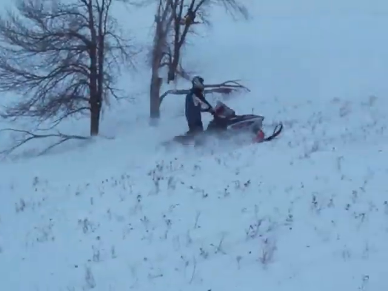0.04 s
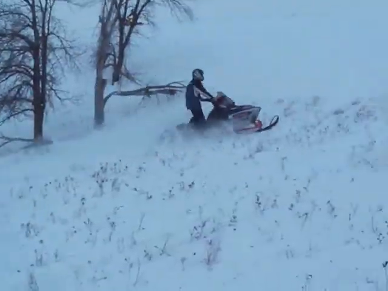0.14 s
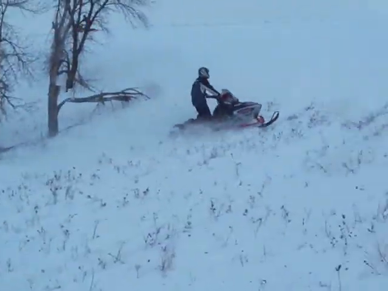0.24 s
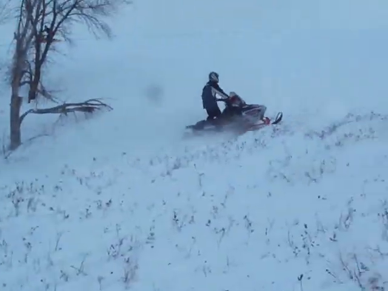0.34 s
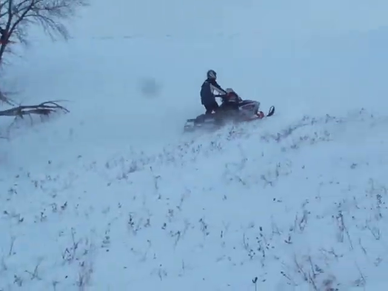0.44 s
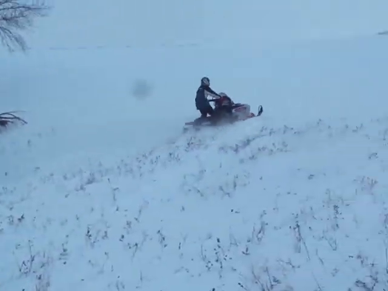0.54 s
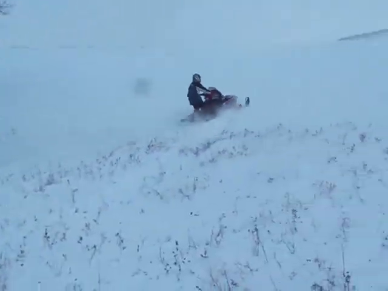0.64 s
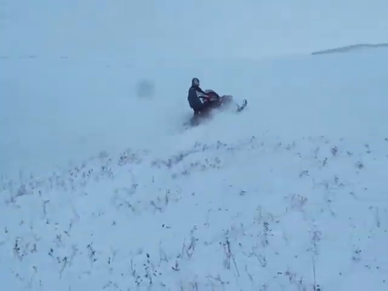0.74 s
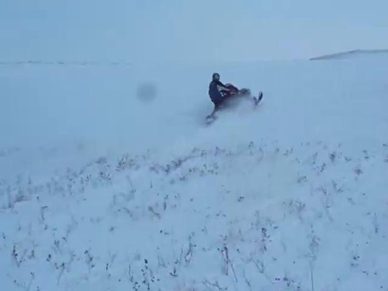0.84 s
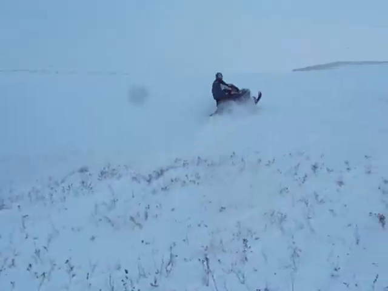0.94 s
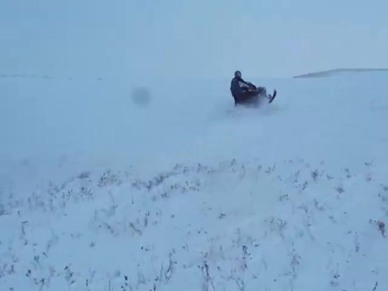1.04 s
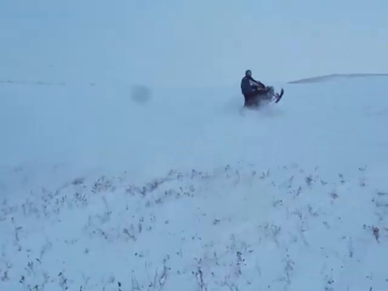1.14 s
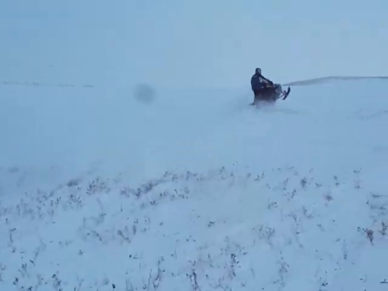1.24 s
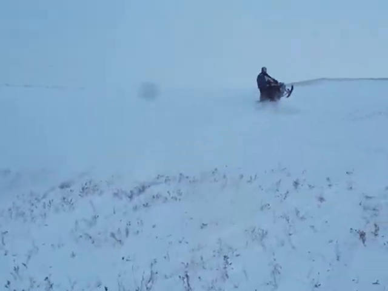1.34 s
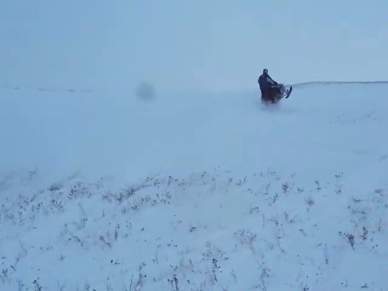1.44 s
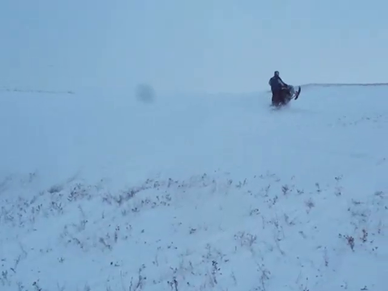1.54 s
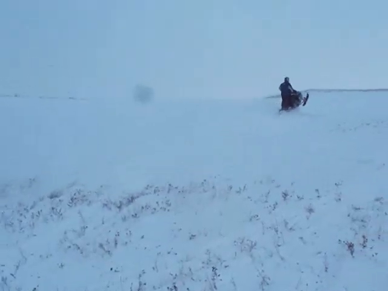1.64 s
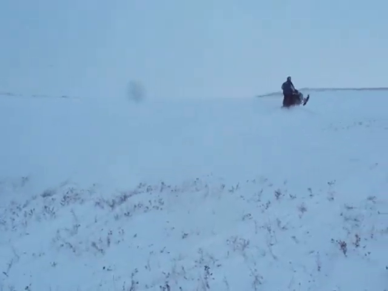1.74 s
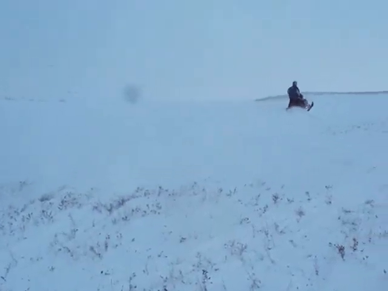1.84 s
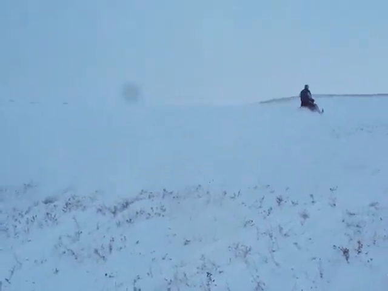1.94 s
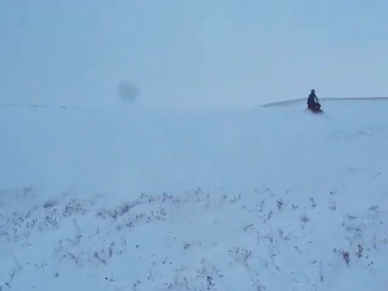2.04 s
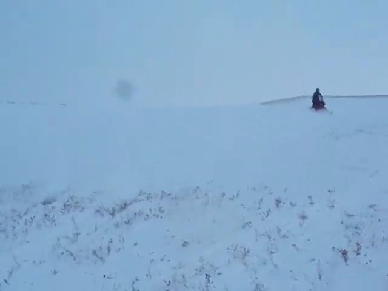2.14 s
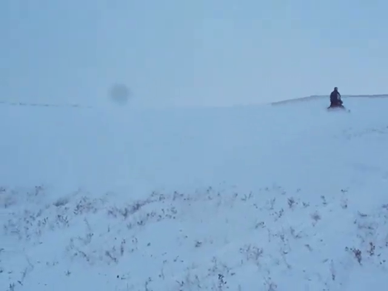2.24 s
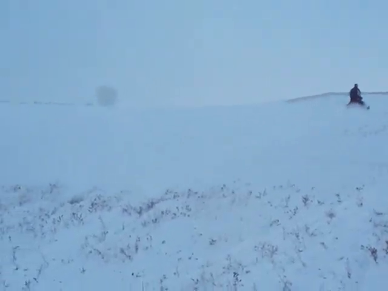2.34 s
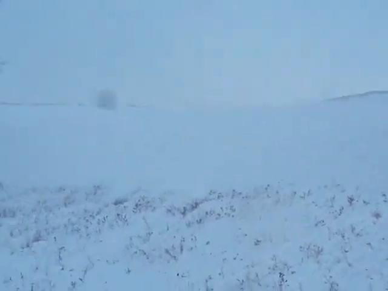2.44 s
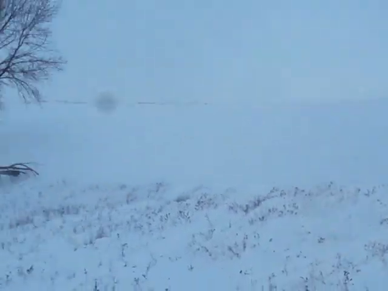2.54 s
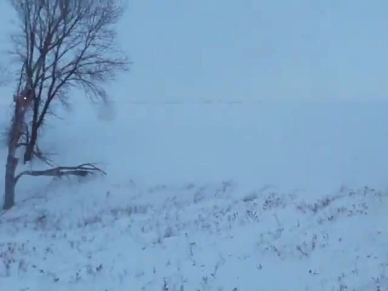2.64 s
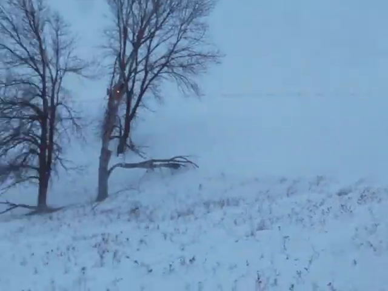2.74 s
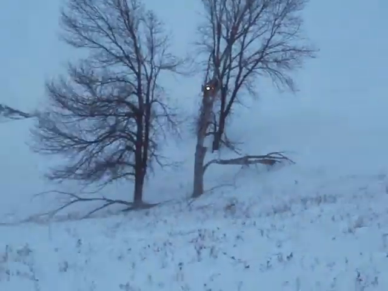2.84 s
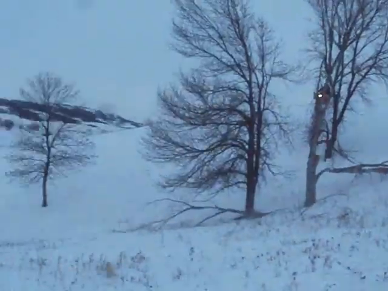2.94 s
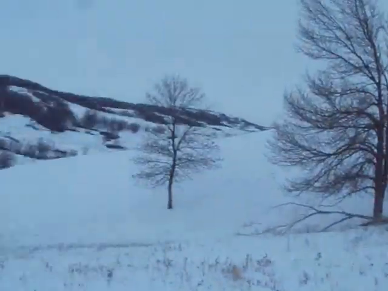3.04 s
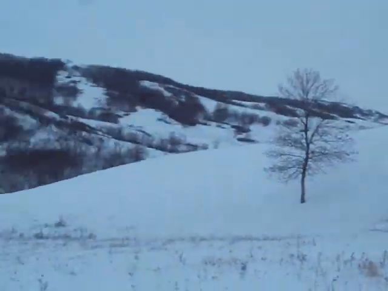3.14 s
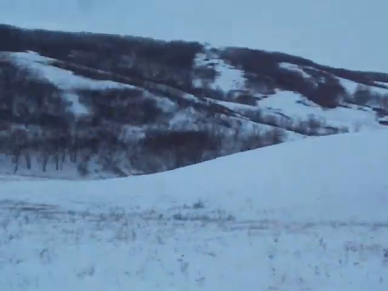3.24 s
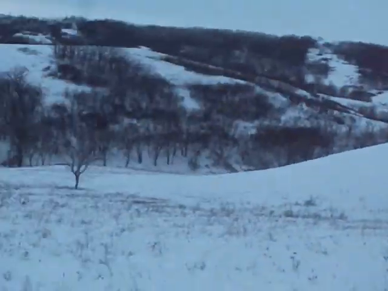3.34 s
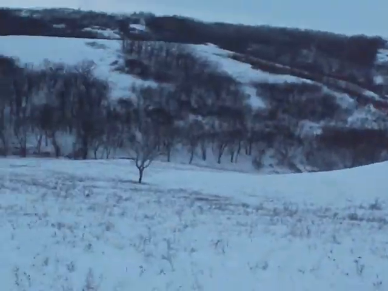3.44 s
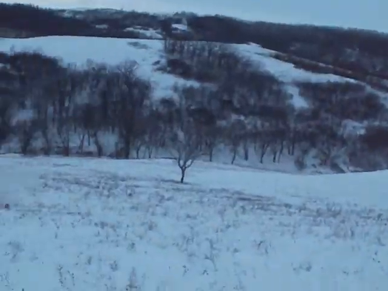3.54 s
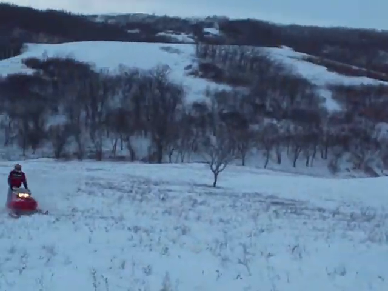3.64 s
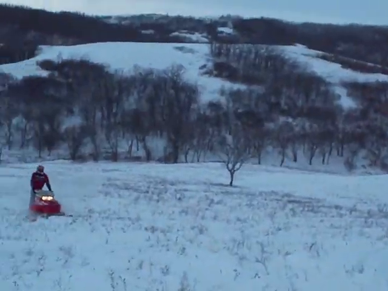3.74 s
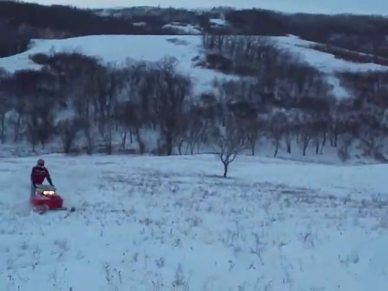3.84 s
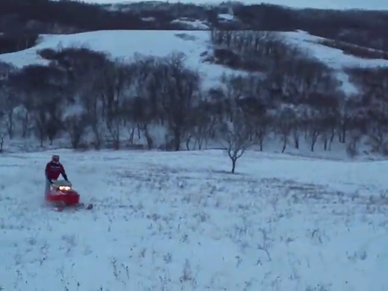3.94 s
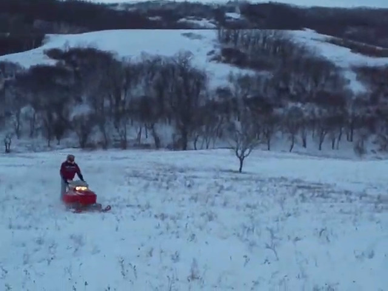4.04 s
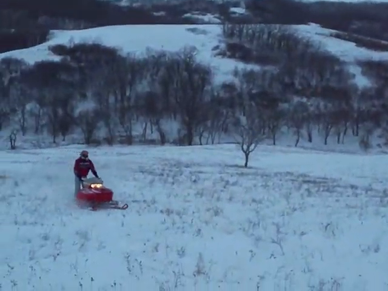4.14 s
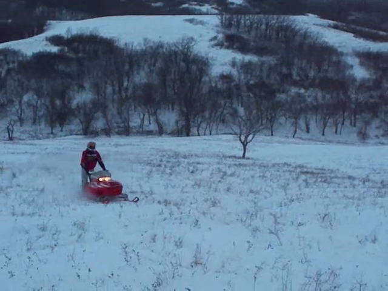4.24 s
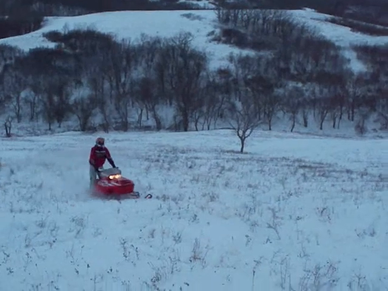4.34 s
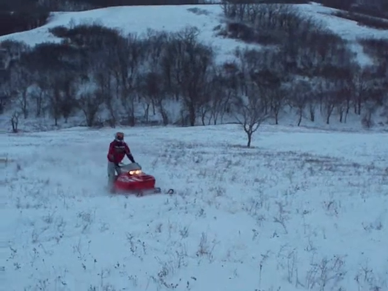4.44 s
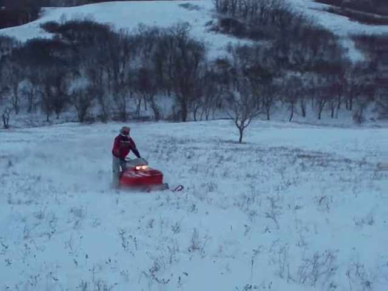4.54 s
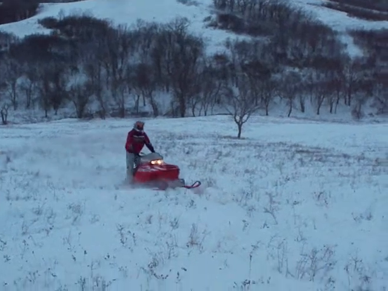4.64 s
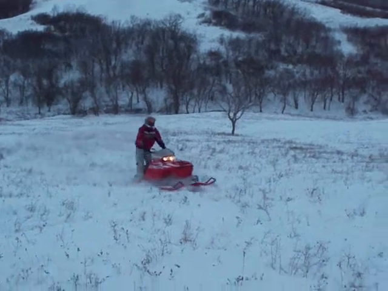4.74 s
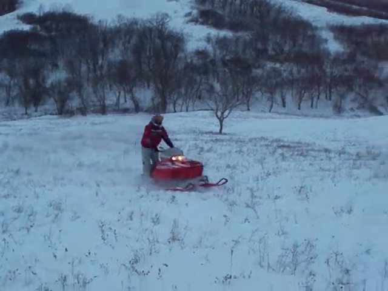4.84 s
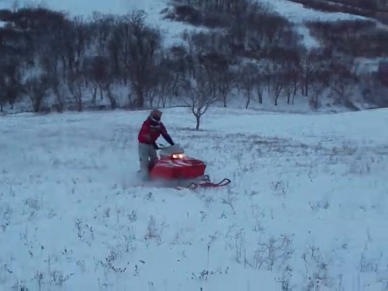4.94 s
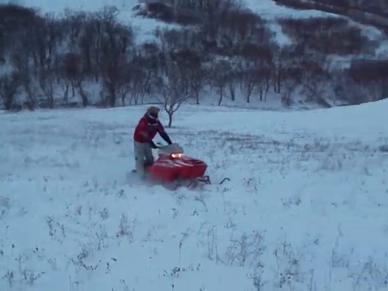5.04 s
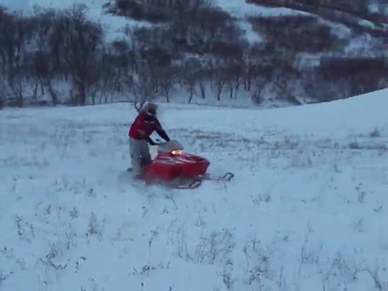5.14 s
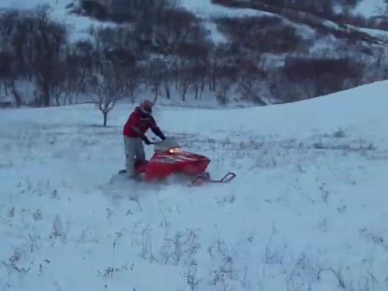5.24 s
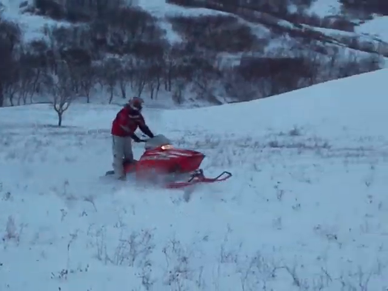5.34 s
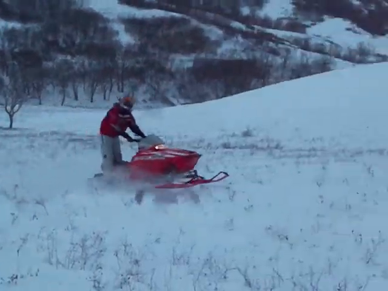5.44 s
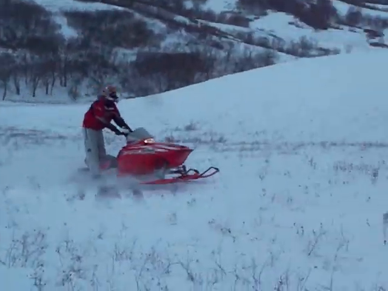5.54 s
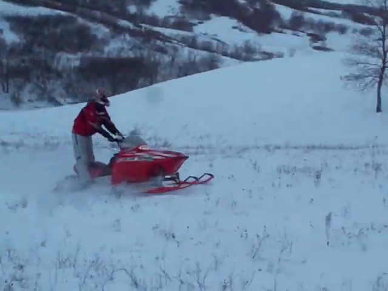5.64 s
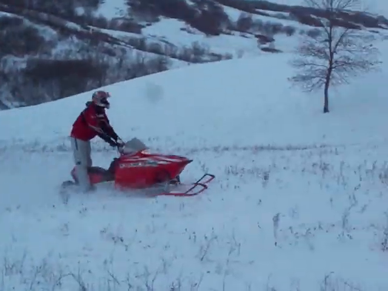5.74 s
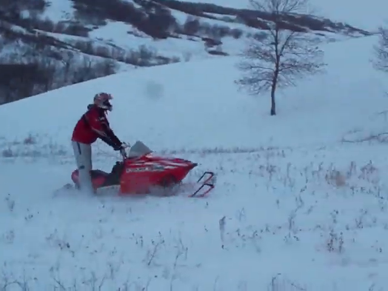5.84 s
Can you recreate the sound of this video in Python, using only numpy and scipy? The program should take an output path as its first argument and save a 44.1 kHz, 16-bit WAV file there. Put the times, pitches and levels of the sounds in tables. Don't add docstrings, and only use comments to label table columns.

```python
import sys
import numpy as np
from scipy import signal
from scipy.fft import rfft, irfft
from scipy.io import wavfile
from scipy.ndimage import uniform_filter1d, minimum_filter1d

SR = 44100
rng = np.random.default_rng(int(sys.argv[2]) if len(sys.argv) > 2 else 0)


def store_pcm(level_fs):
    pcm = np.round(np.clip(level_fs, -1, 1) * 32767).astype(np.int16)
    wavfile.write(sys.argv[1], SR, np.atleast_2d(pcm).T)


def voltage_ratio(decibels):
    exponent = np.asarray(decibels, float) / 20
    return 10 ** exponent


N = 260190


def engine(revs, path, orders, hiss_colour, hillside, mismatch, shadow, roar_db, roar_follows, roar_rasp,
           echo, echo_s, spread, lean, jitter, rough, wander_db, gate, crack_share, heard, nose_db):
    # t/s, loss/dB
    hollows = [
        (.525, 3.5),
        (.566, 5),
        (.65, 2.5),
        (.74, 9.5),
        (.776, 11.5),
        (3.18, 5),
        (5.07, 5),
        (5.28, 6.5),
    ]
    # f/Hz, level/dB per Hz
    roar_colour = [(100, -62.5), (200, -22), (450, -12.5), (700, -8), (1100, -6), (1500, -1), (1950, -6),
                   (2250, -12), (2800, -20), (4200, -21.5)]
    t = np.arange(N) / SR
    (firing_hz,) = in_time(revs)
    engine_db, heading, lag_ms, rasp_db = in_time(path)
    hollow_width_s = 0.016
    for s, loss_db in hollows:
        engine_db = engine_db - loss_db * np.exp(-((t - s) / hollow_width_s) ** 2)

    firings = np.cumsum(firing_hz) / SR + jitter * drift(49)
    tones = crank_tones(firings, firing_hz, engine_db, heading, lag_ms, orders, hillside, mismatch, shadow,
                        echo, echo_s, spread, lean, wander_db, nose_db)
    strength = rng.standard_normal(4000)
    tones *= 1 + rough * np.interp(firings, np.arange(4000), strength)

    puff = 1 + gate * np.cos(2 * np.pi * firings)
    roar_level_db = roar_db + roar_follows * (engine_db + 26) + roar_rasp * (rasp_db + 12.5)
    roar = voltage_ratio(roar_level_db) * coloured(puff * rng.standard_normal(N), roar_colour)

    cracks = rms_one(np.diff(np.floor(firings), prepend=0))
    rasp = puff * rng.standard_normal(N) + crack_share * cracks
    flicker_db = 1.6 * drift(16)
    hiss = voltage_ratio(engine_db + rasp_db + 1.5 + flicker_db) * coloured(rasp, hiss_colour)
    return (tones + roar + hiss) * np.interp(t, *np.transpose(heard))


def crank_tones(firings, firing_hz, engine_db, heading, lag_ms, orders, hillside, mismatch, shadow,
                echo, echo_s, spread, lean, wander_db, nose_db):
    # t/s, length/s, crank order, gain/dB
    swells = [(0.033, 0.082, 12, 2.5), (0.11, .12, 20, 6.5), (.1, .12, 22, 1.5), (0.34, 0.088, 12, 6),
              (1.53, .12, 14, 2.5), (2.91, 0.22, 22, 9), (2.3, 0.11, 18, 2), (3.045, 0.053, 8, 4),
              (4.54, 0.036, 14, 8), (5.13, 0.08, 8, -8.5), (5.17, .05, 14, 9.5), (5.197, 0.061, 26, 11),
              (5.228, 0.09, 4, 6.5), (5.55, 0.21, 16, -7.5), (5.55, 0.18, 20, -7), (4.95, .12, 10, -9),
              (3.2, 0.091, 8, -8.5), (5.48, 0.087, 12, 3.5), (2.7, .25, 26, 5), (2.8, 0.15, 6, -6),
              (.18, 0.053, 12, 4.5), (1.3, .12, 10, 1.5), (3.87, 0.14, 12, 3.5), (5.72, 0.06, 22, 3),
              (0.5, 0.11, 14, -6.5)]
    slow = np.arange(0, N, 64)
    t = slow / SR
    (mismatch_db,), (shadow_db,) = in_time(mismatch), in_time(shadow)
    mismatch_db, shadow_db = mismatch_db[slow], shadow_db[slow]
    engine_db, heading, lag_s = engine_db[slow], heading[slow], lag_ms[slow] / 1000
    hood_db = nose_db * np.clip(heading, 0, 2) * np.clip(4 + mismatch_db / 10, 0, 1)

    wander_hz = 5.55
    fade = np.exp(-128 * np.pi * wander_hz / SR)
    noise = rng.standard_normal((len(orders), len(slow) + 200))
    wander = rms_one(signal.lfilter([1], [1, -2 * fade, fade ** 2], noise)[:, 200:])

    tones, mean_hz = np.zeros(N), firing_hz.mean()
    for k, (_, db, turn_db) in enumerate(orders, 1):
        level_db = db + engine_db + turn_db * heading
        level_db += wander_db * np.sqrt(k / 6) * wander[k - 1]
        if k % 2:
            level_db += mismatch_db
        if k < 4:
            level_db += shadow_db
        if k == 6:
            level_db -= hood_db
        for s, length, order, gain_db in swells:
            if round(order) == k:
                level_db += gain_db * np.exp(-((t - s) / length) ** 2)
        turn = np.pi * k * firing_hz[slow] * lag_s
        comb = np.sqrt(1 + hillside ** 2 - 2 * hillside * np.cos(turn))
        bounce = np.angle(1 + echo * np.exp(-1j * np.pi * k * mean_hz * echo_s))
        phase = np.pi * k * firings + spread * (k - 10) ** 2 - lean + bounce
        tones -= np.sqrt(2) * np.interp(np.arange(N), slow, voltage_ratio(level_db) * comb) * np.cos(phase)
    return tones


def wind():
    # t/s, peak level/dB
    thumps = [(3.008, -24), (3.17, -9), (3.22, -10), (3.468, -11), (3.562, -5), (3.61, -13), (3.689, -9),
              (3.749, -14), (3.82, -18), (3.859, -1.5), (3.89, -1.5), (3.948, -12), (4.041, -4.5),
              (4.074, -3), (4.153, -5), (4.185, -5), (4.218, -3), (4.254, -3), (4.289, -2), (4.34, -2),
              (4.384, -2.5), (4.43, 0), (4.47, -5.5), (4.53, -5.5), (4.553, -3), (4.607, -1.5), (4.7, -9),
              (4.778, -22), (4.849, -13), (5.059, -11)]
    # f/Hz, level/dB per Hz
    rumble_colour = [(30, -24.5), (60, -11), (120, -3), (200, -1), (350, -2.5), (700, -20.5), (3000, -59.5)]
    # f/Hz, level/dB per Hz
    flutter_colour = [(100, -28), (250, -6), (450, -2), (800, -6.5), (1300, -16), (3000, -40.5)]
    gust_db = gusts()
    rumble_lumps = voltage_ratio(2.0 * np.clip(drift(45), -3, 2.2))
    rumble = coloured(rumble_lumps * rng.standard_normal(N), rumble_colour)
    flutter_lumps = voltage_ratio(5.6 * np.clip(drift(120), -3, 1.9))
    flutter = coloured(flutter_lumps * rng.standard_normal(N), flutter_colour)
    out = voltage_ratio(gust_db - 1.5) * rumble + voltage_ratio(2.3 * (gust_db + 25) - 21.5) * flutter

    t = np.arange(round(.02 * SR)) / SR
    for (s, peak_db), hz in zip(thumps, rng.uniform(360, 610, len(thumps))):
        at = round(s * SR)
        swell = np.exp(-((t - .0015) * hz / 0.56) ** 2)
        out[at:at + len(t)] += voltage_ratio(peak_db - 5.0) * np.sin(2 * np.pi * hz * t) * swell
    return out


def gusts():
    # t/s, hold/s, level/dB, dying away/(dB/s)
    gust_rows = [(.08, 0.032, -26.5, 35), (0.658, 0.0092, -46.5, 113), (1.479, .01, -58, 254),
                 (1.711, 0.011, -49.5, 75), (1.99, .01, -42, 180), (2.215, 0.012, -35.5, 82),
                 (2.803, 0.0092, -34, 52), (3.008, 0.057, -30.5, 497), (3.172, 0.14, -33.5, 279),
                 (3.471, .01, -28, 320), (3.58, 0.025, -24, 150), (3.664, 0.24, -24.5, 14),
                 (4.023, 0.537, -26, 110), (4.725, 0.0087, -27.5, 306), (4.782, 0.0044, -27.5, 126),
                 (5.059, .01, -28, 90), (5.296, .01, -36, 598.5), (5.693, .15, -44.5, 109)]
    rise_db_per_s, calm_db = 253.5, -59.5
    t = np.arange(N) / SR
    strongest_db = np.full(N, calm_db)
    for s, hold, db, fall in gust_rows:
        rising_db = rise_db_per_s * np.maximum(s - t, 0)
        falling_db = fall * np.maximum(t - s - hold, 0)
        strongest_db = np.maximum(strongest_db, db - rising_db - falling_db)
    return strongest_db


def gain_control(air):
    over_db = np.maximum(20 * np.log10(np.abs(air) + 1e-9) + 10.3, 0)
    ramp_db = 67.5 * np.arange(N) / SR
    duck_db = np.maximum.accumulate(over_db + ramp_db) - ramp_db
    return .8 * signal.lfilter([.01], [1, -.99], duck_db)


def rms_one(x):
    return x / np.sqrt(np.mean(x ** 2) + 1e-20)


def in_time(rows):
    s, *columns = np.transpose(rows)
    return [np.interp(np.arange(N) / SR, s, c) for c in columns]


def drift(rate_hz):
    r = np.exp(-40 * np.pi * rate_hz / SR)
    slow = signal.lfilter([1], [1, -2 * r, r * r], rng.standard_normal(N // 20 + 2002))[2000:]
    return np.interp(np.arange(N) / 20, np.arange(len(slow)), rms_one(slow - slow.mean()))


def coloured(x, spectrum):
    hz, db = np.transpose(spectrum)
    grid = np.maximum(np.arange(N // 2 + 1) * SR / N, 1)
    return rms_one(irfft(rfft(x) * voltage_ratio(np.interp(np.log(grid), np.log(hz), db)), N))


def scene():
    # t/s, firing f/Hz
    climb_revs = [
        [(0.0, 252.6), (0.114, 259.6), (0.156, 266.8), (0.254, 271.0), (0.612, 262.2), (0.65, 266.3),
         (0.684, 260), (0.78, 258.8)],
        [(0.79, 258), (1.024, 269.3), (1.234, 271.1), (1.374, 263.4), (1.462, 269.9), (1.534, 261.6),
         (1.65, 257.7), (1.86, 255.6)],
    ]
    # t/s, engine level/dB, heading (-2..2), hillside echo lag/ms, hiss over engine/dB
    first_pull = [
        (0, -19, 0.79, 0.28, -14),
        (0.08, -14.5, -0.99, 0.18, -13),
        (0.17, -14.5, 0.048, 0.34, -9),
        (0.26, -14, -1.2, 0.37, -11),
        (0.35, -17, 0.52, 0.33, -7.5),
        (0.5, -21, -0.041, 0.48, -14),
        (0.62, -24, -0.95, 0.36, -11),
        (0.7, -18, -1.89, 0.31, -14.5),
    ]
    # t/s, engine level/dB, heading (-2..2), hillside echo lag/ms, hiss over engine/dB
    second_pull = [
        (0.81, -19, -2.4, 0.23, -7),
        (0.88, -20, 0.41, 0.37, -9.5),
        (0.981, -16, 1.43, 0.23, -5),
        (1.2, -16, 1.74, 0.67, -6),
        (1.39, -17.5, 1.4, 0.67, -9),
        (1.47, -17, 1.1, 0.69, 0.5),
        (1.58, -23.5, 1.14, 0.81, -5.5),
        (1.74, -24.5, -1.09, 0.72, -2.5),
        (1.9, -31.5, 0.18, 0.72, -5.5),
    ]
    # label (unused), level/dB, level per unit of heading/dB
    climb_orders = [(1, -45.0, 1), (1.999, -18.5, -2.5), (3.23, -46, 6), (4.003, -4.9, -0.63),
                    (5.05, -35.5, 1), (6.082, 0.0, 0.24), (7.04, -25.5, -1.5), (8, -8.5, 3),
                    (9.55, -32.5, 3.5), (10, -7, 3), (11, -28.5, 2.5), (12, -6.9, 1), (13, -27.5, 5),
                    (14, -9.5, 3.5), (15, -32.5, 4.5), (16, -15.5, -1.7), (17, -28.5, -2.5), (18, -23, 3.5),
                    (19, -34.5, -3.0), (20, -27.5, 1), (21, -46.5, 5.5), (22, -30, 4), (23, -36.5, 6),
                    (24, -22.5, 0.5), (24, -37, 6), (26, -21, 1.3)]
    # f/Hz, level/dB per Hz
    climb_hiss = [(1800, -32), (2400, -25.5), (3000, -9.5), (3700, -13), (4200, -16.5), (4700, -18),
                  (5500, -19), (6500, -10), (7500, -14), (8200, 3), (9500, -57.5)]
    # t/s, firing f/Hz
    arrive_revs = [(1.9, 266.5), (2.11, 268.6), (2.21, 265.4), (3.15, 269.6), (3.22, 272.3), (3.69, 265.1),
                   (3.82, 270.3), (3.95, 268.4), (4.23, 272.4), (4.53, 266.5), (4.63, 271.9), (4.87, 269.6),
                   (5.03, 274.7), (5.12, 260.2), (5.26, 269), (5.61, 271), (5.71, 267.8), (5.9, 255.2)]
    # t/s, engine level/dB, heading (-2..2), hillside echo lag/ms, hiss over engine/dB
    arrive_path = [(1.9, -40, 1.4, 0.9, -31), (2.3, -38.5, 1.65, 0.96, -26), (2.621, -40.5, 1.7, 1.09, -26),
                   (2.78, -29.5, 1.86, 1.01, -4.5), (3.06, -30.5, 2.1, 1.04, 2), (3.3, -29, 0.3, 1.16, -2),
                   (3.45, -28, -0.6, 1.03, -3), (3.7, -31, -1, 1.13, -12), (4.0, -29, -0.9, 0.93, -13),
                   (4.25, -31, -0.3, 1.07, -12), (4.5, -33, -3, 1.38, -7.5), (4.7, -29, -0.8, 1.27, -15.5),
                   (5.03, -26, 0.56, 0.977, -7.5), (5.171, -27, 0, 1.46, -6), (5.27, -26.5, 0.5, 0.75, -8),
                   (5.5, -21.5, 0.56, 0.71, -18), (5.72, -23.5, 0.9, .79, -10.5),
                   (5.9, -26.5, 0.9, .82, -9)]
    # label (unused), level/dB, level per unit of heading/dB
    arrive_orders = [(0.994, -25.5, 2.5), (1.9917, -6.5, 1.3), (2.98, -17, 0.5), (3.999, 2.5, 1.5),
                     (4.88, -30, 7), (6.01, 0.5, -0.7), (6.98, 1.3, -1.5), (7.955, -0.24, 2.5),
                     (9, -11, -0.5), (9.786, -6, 1.5), (10.86, -4, 2.2), (11.956, -1.3, 0), (13, -1.5, -3),
                     (13.904, -5, 2), (15, -23.5, 0.7), (15.9, -12, 4.5), (17.14, -18.5, 2),
                     (17.97, -11.5, 2.5), (19, -24, 1.8), (19.81, -17, 1.5), (21, -28, 4),
                     (21.82, -19.5, 5), (22.2, -21.5, -2.5), (24, -27.5, 3.5), (25, -35.5, 3.8),
                     (26, -22.5, -0.5), (27, -37.5, -0.5), (25.9, -39, 4), (29, -32.5, 0), (30, -37.5, 2.5)]
    # f/Hz, level/dB per Hz
    arrive_hiss = [(1800, -40.5), (2400, -8.5), (3000, -15), (3700, -21), (4700, -18.5), (5500, -8.5),
                   (6400, -3), (7200, -8.5), (8200, -1.5), (9500, -53)]
    climbing = engine(sum(climb_revs, []), first_pull + second_pull, climb_orders, climb_hiss,
                      hillside=0.39, nose_db=-0.5, mismatch=[(0, 0), (2, 0)], shadow=[(0, 0.01), (2, 0)],
                      roar_db=-29.0, roar_follows=0.32, roar_rasp=0.13, echo=0.43, echo_s=0.001255,
                      spread=0.024, lean=-0.27, jitter=0.0064, rough=0.068, wander_db=0.96, gate=0.21,
                      crack_share=1.1, heard=[(0, 0.94), (1.86, 0.93), (1.92, 0.17)])
    arriving = engine(arrive_revs, arrive_path, arrive_orders, arrive_hiss,
                      hillside=0.3, nose_db=2.0, mismatch=[(3.5, -1), (3.65, -15.5)],
                      shadow=[(5.35, 1), (5.8, -13.5)],
                      roar_db=-28, roar_follows=0.79, roar_rasp=.3, echo=0.86, echo_s=.0011,
                      spread=0.019, lean=1.2, jitter=0.00057, rough=.12, wander_db=1.57, gate=0.092,
                      crack_share=1.2, heard=[(0, 0), (1.55, 0), (1.75, 1)])
    air = wind()
    return (voltage_ratio(-gain_control(air)) * (climbing + arriving) + air)[None]


def starve(x, under_db, masked_db):
    hz, _, cells = signal.stft(x, SR, nperseg=1024)
    power = uniform_filter1d(np.abs(cells) ** 2, size=2, axis=-2)
    power = uniform_filter1d(power, size=6, axis=-1)
    nearby_top = -minimum_filter1d(-power, size=11, axis=-2)
    faint = power < power.max(axis=-2, keepdims=True) * voltage_ratio(-2 * under_db)
    masked = power < nearby_top * voltage_ratio(-2 * masked_db)
    treble = ((hz > 2150) & (hz < 4600))[:, None]
    cells[(faint | masked) & treble] *= .04
    return signal.istft(cells, SR, nperseg=1024)[1][..., :N]


def band_limit(x):
    return signal.sosfilt(signal.butter(12, 8970, fs=SR, output="sos"), x)


def record(dry):
    gap_hz = [4008, 4230]
    x = signal.lfilter(*signal.iirnotch(4220, 4220 / 450, SR), dry)
    x = signal.sosfilt(signal.butter(2, gap_hz, "bandstop", fs=SR, output="sos"), x)
    x = signal.sosfilt(signal.cheby2(20, 70, 8250, fs=SR, output="sos"), x)
    x = starve(x, under_db=43, masked_db=13.5)
    mix = np.clip(x, -1, 1)
    return band_limit(mix)


dry = scene()
out = record(dry)
store_pcm(out)
```